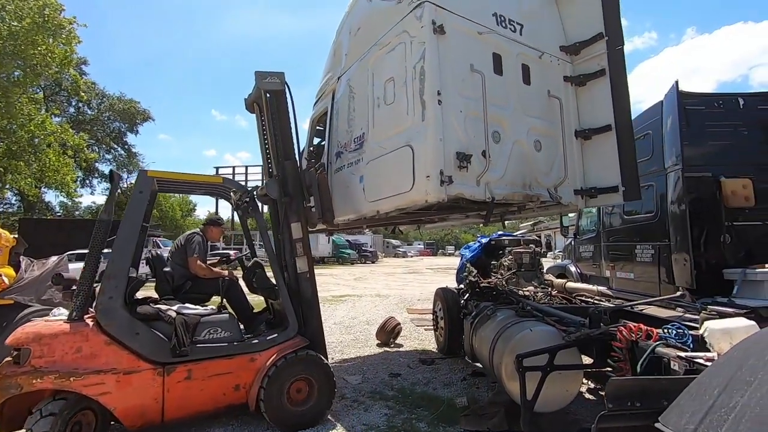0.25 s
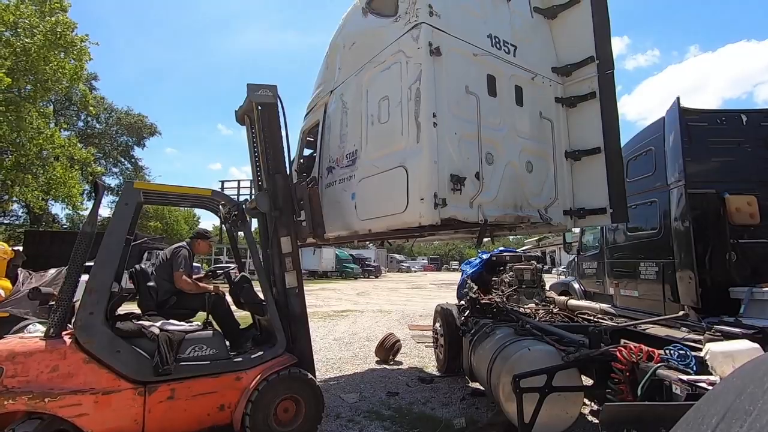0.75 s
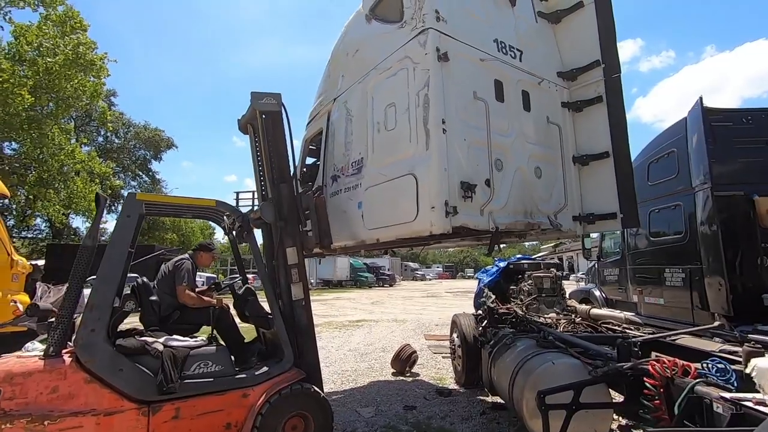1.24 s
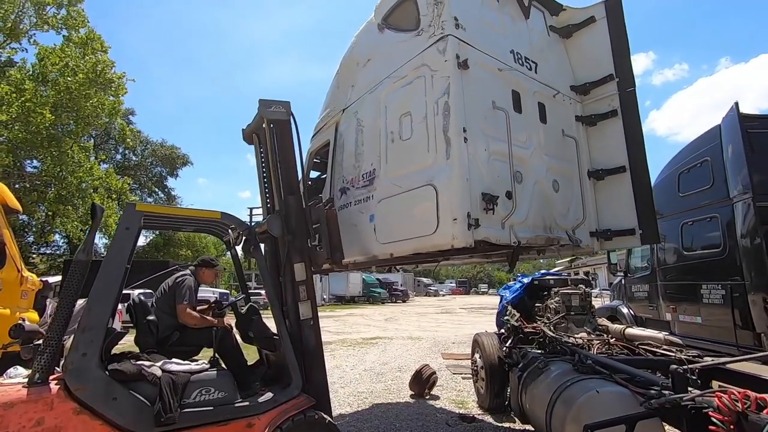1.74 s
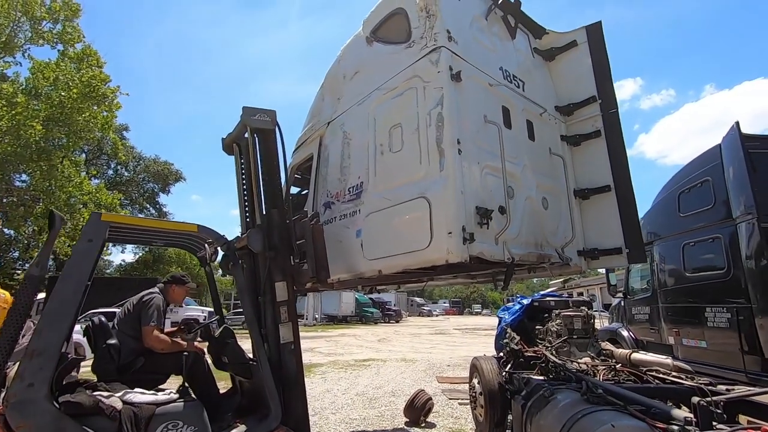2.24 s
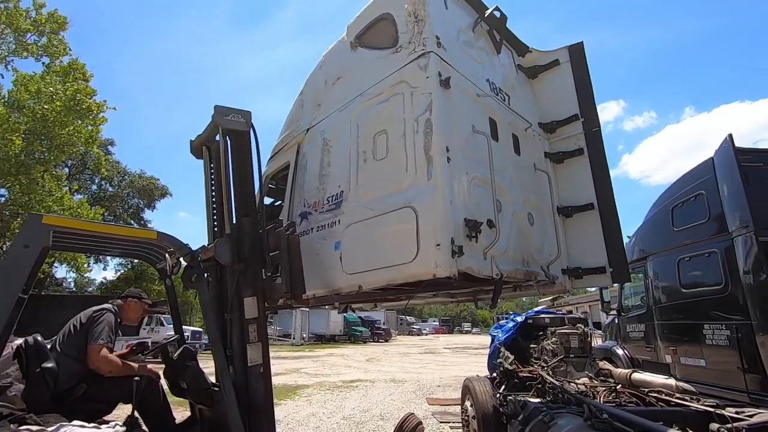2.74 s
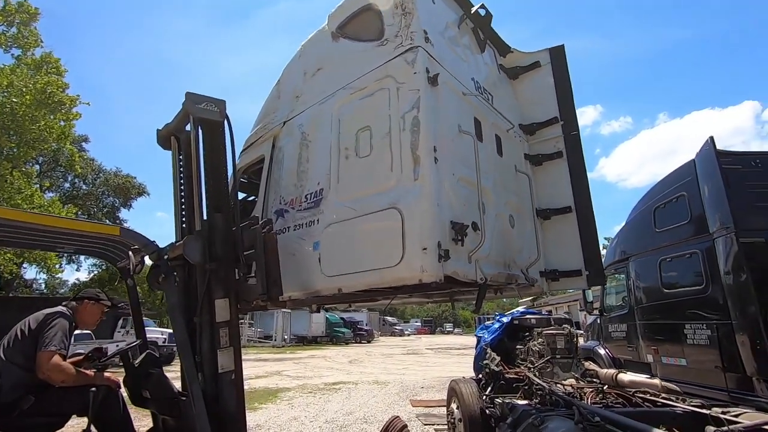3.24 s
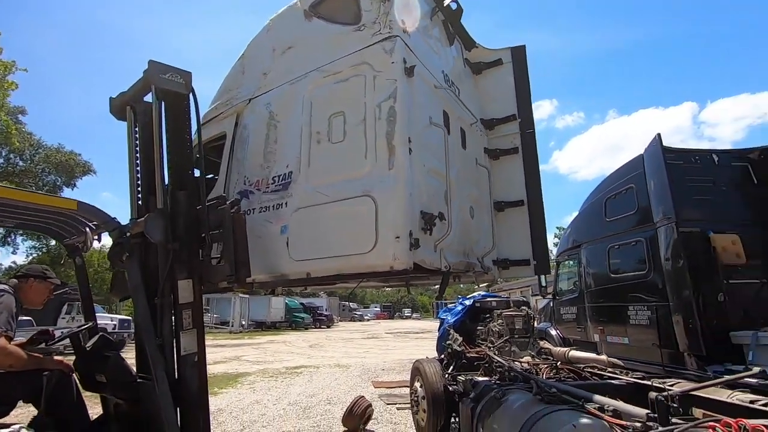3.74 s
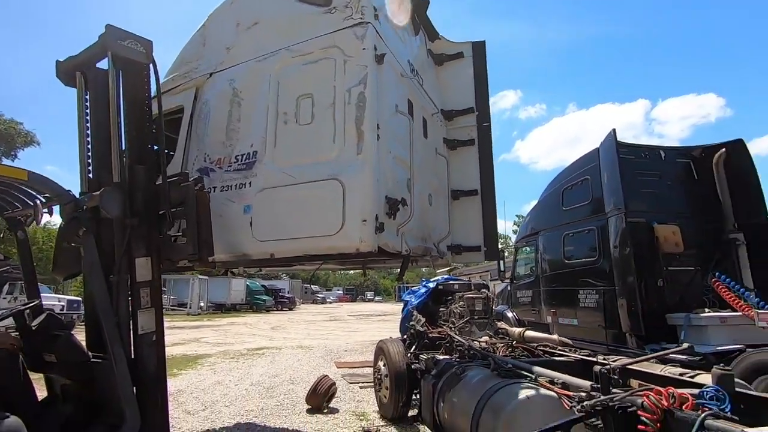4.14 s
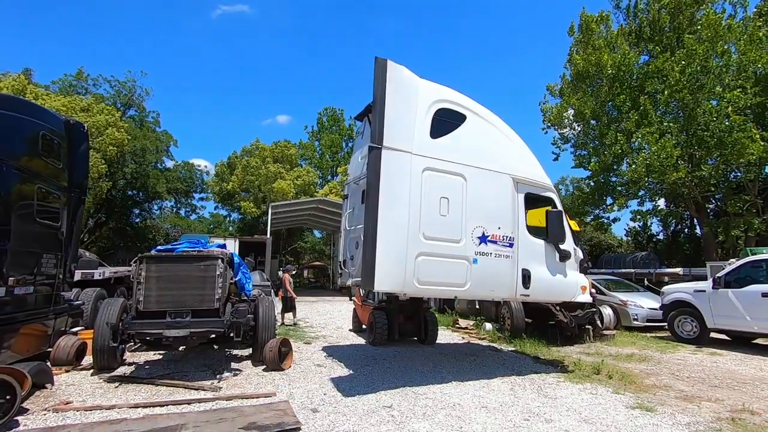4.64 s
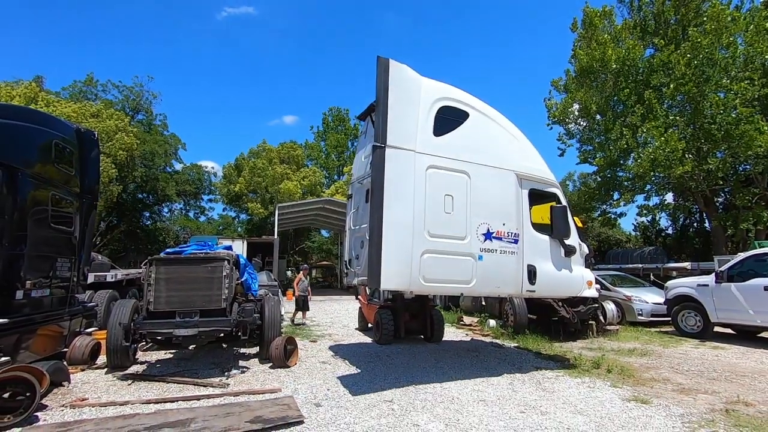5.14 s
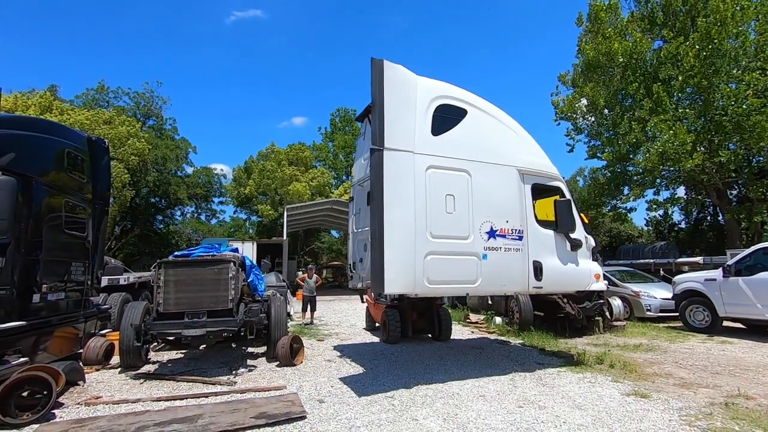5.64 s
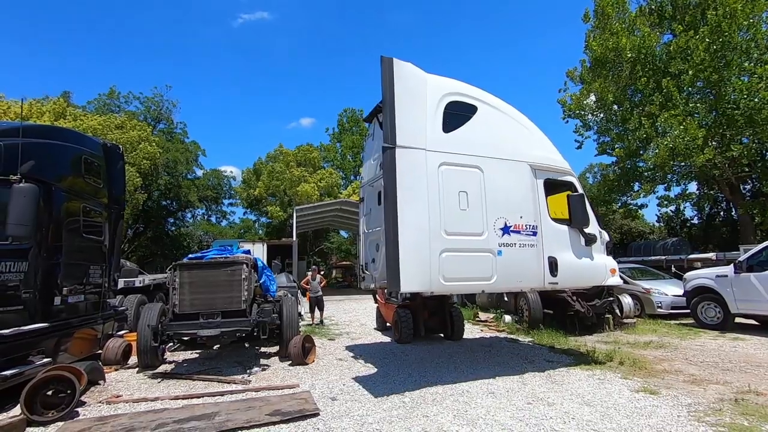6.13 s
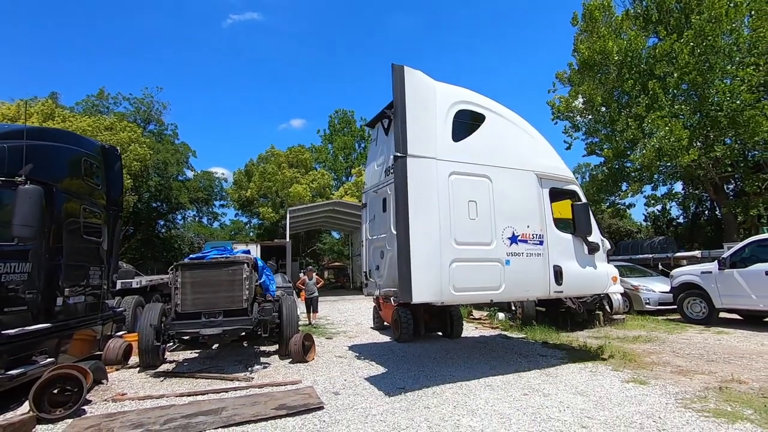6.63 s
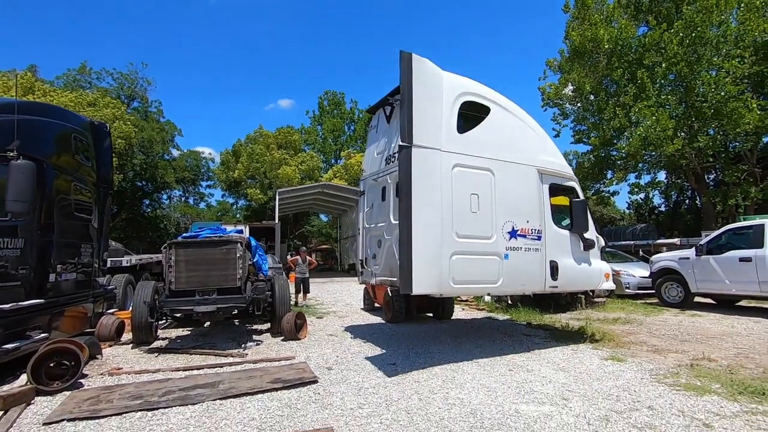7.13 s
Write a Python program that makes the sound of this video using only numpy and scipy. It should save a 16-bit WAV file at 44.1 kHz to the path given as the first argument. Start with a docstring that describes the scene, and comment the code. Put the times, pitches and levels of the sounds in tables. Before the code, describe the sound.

Steady low diesel engine hum with fan roar and gravel crunches up close, a short gap, then a duller distant engine and second throbbing drone.

```python
"""Exhaust hum, injector clatter, fan roar and crunching gravel: a three-cylinder diesel forklift idles along a yard.
It is heard from close by in stereo, then, after a short silence, from further off in mono, where a second
engine drones and a cicada pulses in the trees. The hum and whines are multiples of the engine cycle, the
clatter is struck resonances, the roar and hiss are shaped noise, and the gravel is showers of ringing grains."""
import sys
import numpy as np
from scipy import signal
from scipy.fft import rfft, irfft, next_fast_len
from scipy.io import wavfile
from scipy.ndimage import uniform_filter1d, map_coordinates

SR = 44100
rng = np.random.default_rng(int(sys.argv[2]) if len(sys.argv) > 2 else 0)


def to_wav(sig):
    """Store sig (one row per channel, or 1-D mono) as 16-bit WAV at the path in sys.argv[1].

    Samples outside -1..1 are clipped; the rate is SR.
    """
    pcm = np.clip(np.atleast_2d(sig), -1, 1) * 32767
    pcm = np.round(pcm).astype(np.int16)
    wavfile.write(sys.argv[1], SR, pcm.T)  # frames by channels


N = 325458
T = np.arange(N) / SR
OPEN_S = 4.668  # the distant view begins
FIRING_LEAD = .635  # share of a firing
# strength of each cylinder's injector tick, relative: level_db
CYLINDERS = [4.5, -.5, -1.5]


def amp(db):
    """Level law: a gain is 10 to the power of decibels over 20."""
    return 10 ** (np.asarray(db) / 20)


def unit(x):
    """Normalisation by power: the signal is scaled to rms 1."""
    return x / np.sqrt(np.mean(x ** 2) + 1e-20)


def along(points, hz):
    """Spectra are interpolated over log frequency from (Hz, value) points."""
    point_hz, value = np.transpose(points)
    return np.interp(np.log(hz + 1), np.log(point_hz + 1), value)


def curves(rows):
    """Linear interpolation in time: one value per sample for each column after the time."""
    s, *columns = np.transpose(rows)
    return [np.interp(T, s, column) for column in columns]


def between(ends, share):
    """Linear blend from the first row to the second as share goes from 0 to 1."""
    first, last = np.array(ends)[..., None]
    return first + (last - first) * share


def wobble(rate, size=1):
    """Slow random modulation: a spline through rate knots a second, read at every size-th sample."""
    return map_coordinates(rng.standard_normal(200), [T[::size] * rate])


def filtered(x, response):
    """Linear filtering: the spectrum is multiplied by a response of frequency."""
    m = next_fast_len(N + SR // 4)
    return irfft(rfft(x, m) * response(np.fft.rfftfreq(m, 1 / SR)), m)[..., :N]


def rush(spectrum, patchy_db):
    """Turbulence as coloured noise of rms 1, patchy in time and frequency."""
    z = signal.stft(rng.standard_normal(N), nperseg=512)[2]
    patches = uniform_filter1d(rng.standard_normal(z.shape), size=12, axis=1)
    patches = uniform_filter1d(patches, size=6, axis=0)
    noise = signal.istft(z * amp(patchy_db * unit(patches)), nperseg=512)[1][:N]
    return unit(filtered(noise, lambda hz: amp(along(spectrum, hz))))


def resonant(modes):
    """Modal response: a sum of (Hz, width Hz, dB) resonances of alternating sign, dull above 5 kHz."""
    def response(hz):
        total = 0
        for k, (centre, width, db) in enumerate(modes):
            damping = 1j * hz * width
            total = total + (-1) ** k * amp(db) * damping / (centre ** 2 - hz ** 2 + damping)
        return total / (1 + (hz / 5000) ** 4)
    return response


def contacts(events, response, rise_s):
    """Impact excitation: short decaying bursts of noise drive a response."""
    out, t = np.zeros(N), T[:SR // 5]
    for s, db, t60_s in events:
        envelope = amp(db - 60 * t / t60_s) * (1 - np.exp(-t / rise_s))
        out[round(s * SR):][:len(t)] += envelope * rng.standard_normal(len(t))
    return filtered(out, response)


def cicada():
    """Amplitude modulation: a high band of noise swells about eight times a second."""
    # time_s, mean_level_db
    loudness = [(4.7, -80), (5.5, -66), (7.38, -68)]
    # relative spectrum: frequency_hz, density_db
    band = [(7400, -40), (8200, 0), (9000, -3), (10000, -12), (11000, -40), (12000, -120)]
    swell = amp(6 * np.cos(2 * np.pi * (7.8 * T - .34)))
    return amp(curves(loudness)[0]) * swell * rush(band, patchy_db=2.0)


def gust():
    """Wind turbulence: one puff of low-frequency noise under a bell-shaped envelope."""
    # centre_s, half_width_s, peak_level_db
    s, width_s, peak_db = (6.0, .1, -31)
    low = [(15, -18), (35, -1.0), (55, -12), (100, -40), (300, -120)]
    return amp(peak_db) * np.exp(-((T - s) / width_s) ** 2) * rush(low, patchy_db=-4.5)


def drone():
    """Periodic firing: a second engine's first three harmonics slow a little and throb."""
    # time_s, fundamental_hz, level_db
    pitch_and_level = [(4.7, 68.4, -30), (5.7, 67.5, -28), (6.1, 67, -32), (6.4, 65, -35), (6.8, 64.5, -28),
                       (7.38, 64.3, -29)]
    # each harmonic relative to that level: level_db
    multiples_db = [-7, 1.5, -9]
    hz, level_db = curves(pitch_and_level)
    phase = 2 * np.pi * np.cumsum(hz + .6 * wobble(6)) / SR
    out = 0
    for k, db in enumerate(multiples_db, start=1):
        out = out + amp(level_db + db + 2 * wobble(9)) * np.sin(k * phase)
    return np.sqrt(2) * out


def yard():
    """Diffuse scattering: noise that is added to the left and subtracted from the right."""
    # relative spectrum: frequency_hz, density_db
    scattered = [(18, -37.5), (30, 10), (64, -17), (103, 2), (211, -29.5), (346, -16), (421, -16.5),
                 (1100, -11), (3350, -19), (4500, -26), (6680, -19), (9680, -35.5), (11000, -47.5),
                 (14200, -78.5), (22000, -120)]
    return amp(-34.5) * rush(scattered, patchy_db=2.1)


def gravel():
    """Granular friction: stones under the tyres ring as dense showers of short damped grains."""
    # tyre crunches before panning: peak_s, half_width_s, level_db, pitch_hz
    crunches = [(.08, 0.043, -41.5, 2600), (.16, 0.064, -35, 3050), (.24, 0.04, -39.5, 2450),
                (0.362, .06, -40, 3040), (0.45, 0.059, -37.5, 3070), (.3, .2, -44, 3520),
                (.46, 0.091, -48, 4980), (1.582, .25, -37.5, 3255), (1.302, 0.055, -38, 3000),
                (1.43, .05, -37, 2940), (1.521, 0.052, -37, 3225), (1.64, 0.046, -35.5, 2673),
                (1.799, 0.077, -41, 2700)]
    count, t, out = 550, T[:SR // 100], np.zeros(N)
    for s, width_s, db, hz in crunches:
        place, size, life = rng.random((count, 3)).T
        when = s + width_s * (4 * place - 2)
        pitch = hz * np.exp(.13 * rng.standard_normal(count))
        # few strong grains among many weak ones; none before time zero
        strength = amp(-2.1 * np.log(size)) * (when > 0)
        decay_s = .001 + .002 * life
        grains = strength[:, None] * np.sin(2 * np.pi * np.outer(pitch, t))
        grains = grains * np.exp(-t / decay_s[:, None]) * (1 - np.exp(-t / .0006))
        samples = (np.abs(when) * SR).astype(int)[:, None] + np.arange(len(t))
        rustle = np.bincount(samples.ravel(), grains.ravel(), N)
        # rms 1 over the four half widths that hold the grains
        rustle = rustle / np.sqrt(np.sum(rustle ** 2) / (4 * width_s * SR))
        out = out + amp(db) * np.exp(-np.abs((T - s) / width_s) ** 1.36) * rustle
    return out


def ticks():
    """Impact of light metal: soft bright contacts in the mast and chains."""
    # start_s, strength_db before the response, t60_s
    events = [(2.314, -31, .03), (2.4296, -45.5, 0.039), (2.596, -41, 0.21), (2.615, -40, 0.088),
              (3.32, -41, 0.22), (3.35, -39.5, .15)]
    bright = [(5000, -20), (9000, 0), (11000, -12), (15000, -28)]
    return contacts(events, lambda hz: amp(along(bright, hz)), rise_s=.003)


def bumps():
    """Modal ringing: faint dull knocks, perhaps the load on the forks."""
    # start_s, strength_db before the resonances, t60_s
    events = [(6.022, -9, .04), (6.048, -11, .04), (6.066, -11, .04), (6.502, -14, .05), (6.571, -9, .05),
              (6.69, -14, .05)]
    # what the bumps ring: frequency_hz, width_hz, level_db
    load = [(480, 220, -2), (706, 310, 3.5), (1460, 280, -12)]
    return contacts(events, resonant(load), rise_s=0.0013)


def fan():
    """Steady rotation: a low, slightly unsteady sine, perhaps the cooling fan."""
    # frequency_hz, level_db
    mean_hz, level_db = (47.3, -36)
    phase = 2 * np.pi * np.cumsum(mean_hz + 0.28 * wobble(0.77)) / SR
    return np.sqrt(2) * amp(level_db + 0.6 * wobble(3.5)) * np.sin(phase)


def whirr():
    """Band-limited noise: a narrow whirr near 3.4 kHz, perhaps from a belt."""
    return rush([(2700, -70.0), (3200, -15.5), (3380, 0.5), (3600, -13), (4200, -63.5)], patchy_db=3.5)


def sing(turns, tones):
    """Order tracking: thin tones of gears and pump keep fixed multiples of the engine cycle, wavering a little."""
    out = 0
    for k, db in tones:
        out = out + amp(db + 1.5 * wobble(4)) * np.cos(2 * np.pi * k * turns + .5 * wobble(5))
    return np.sqrt(2) * out


def pump(turns, upper):
    """Order tracking: pump whine at the 36th multiple of the cycle, with another tone at the 40th."""
    # 36th multiple: time_s, level_db
    whine = [(0, -48), (1.6, -42), (1.95, -42), (2.3, -44), (3.0, -37.5), (3.6, -36.5), (4.5, -35.5),
             (4.7, -39.5), (7.38, -46.5)]
    main = amp(curves(whine)[0]) * np.cos(2 * np.pi * 36 * turns + 1 + .1 * wobble(3))
    return np.sqrt(2) * (main + upper * np.cos(2 * np.pi * 40 * turns + .3 * wobble(3)))


def body():
    """Cavity and panel resonance: the body and hollow load boom mostly between 140 and 300 Hz."""
    # one swell of the boom: centre_s, half_width_s, rise_db
    s, width_s, swell_db = (2.45, 0.32, 4.3)
    hollow = [(60, -65.0), (140, -4), (190, -8.5), (245, -4.5), (290, -6.5), (380, -34), (900, -120)]
    return amp(swell_db * np.exp(-((T - s) / width_s) ** 2)) * rush(hollow, patchy_db=1.5)


def clatter(firing, modes, t60_s, rise_s, blow, cylinders, scatter_db):
    """Impulsive excitation: each firing rings metal parts with one blow and a short rattle; rms 1."""
    firing = firing + .0015 * wobble(25)  # timing scatter, share of a firing
    count = np.floor(firing).astype(int)
    since_s = (firing - count) / np.gradient(firing) / SR
    size_db = np.array(cylinders)[count % 3] + scatter_db * rng.standard_normal(400)[count]
    rattle = amp(-60 * since_s / t60_s) * (1 - np.exp(-since_s / rise_s)) * rng.standard_normal(N)
    impulses = blow * np.diff(count, prepend=count[0])
    return unit(filtered(amp(size_db) * (rattle + impulses), resonant(modes)))


def exhaust(turns, orders, groups_db, pipe, unsteady):
    """Fourier series of the engine cycle; unequal cylinders fill and unsettle the multiples between firings."""
    step = 8  # the series is summed at a lower rate
    slow, out = turns[::step], 0
    delay_firings, skew, first, upper = pipe
    for k, db in orders:
        loose = unsteady if k % 3 else .25
        waver_db = 1.7 * loose * wobble(5, size=step)
        waver = .25 * loose * wobble(3, size=step)
        # one cylinder stands out
        lag = 2 * np.pi * delay_firings * k / 3 + skew * (k % 3 > 0) * (k >= first)
        # the pipe delays the lowest multiples and disperses the highest
        lag += -1.3 * (k < 8) + .55 * (k < 5) + upper * (k > 11) - .06 * max(k - 15, 0) ** 2
        group_db = groups_db[0 if k == 9 else 1 + (k > 19) + (k > 32)][::step]
        out = out + amp(db + waver_db + group_db) * np.cos(2 * np.pi * k * slow + lag + waver)
    return np.sqrt(2) * signal.resample_poly(out, step, 1)[:N]


def forklift(turns, levels_db, orders, roar, hiss, pipe, unsteady, throb_db, patchy_db):
    """Superposition on one crankshaft: hum, whine, throbbing roar, knocks, ticks, hiss and booming body."""
    # engine casing: frequency_hz, width_hz, level_db
    block = [(733, 63, -4), (1427, 150, 2), (1688, 80, 0.5), (3330, 220, -20)]
    # casing knock of each cylinder, relative: level_db
    knocks = [1, -4, 1]
    # injector and valve cover: frequency_hz, width_hz, level_db
    injector = [(2140, 230, 0.5), (2398, 130, 3), (3400, 200, -18)]
    upper, mid, knock, tick, air, boom = amp(levels_db[4:])
    firing = 3 * turns + FIRING_LEAD
    throb = amp(throb_db * np.cos(2 * np.pi * (firing - .15)))
    out = exhaust(turns, orders, levels_db[:4], pipe, unsteady) + pump(turns, upper)
    out = out + mid * throb * rush(roar, patchy_db)
    # the casing knock follows the injector tick by .05 of a firing
    out = out + knock * clatter(firing - .05, block, t60_s=0.11, rise_s=0.0009, blow=9,
                                cylinders=knocks, scatter_db=1.5)
    out = out + tick * clatter(firing, injector, t60_s=.04, rise_s=.001, blow=20,
                               cylinders=CYLINDERS, scatter_db=1.3)
    return out + air * rush(hiss, patchy_db=1.05) + boom * body()


def far_view():
    """Distant source: one shared channel of forklift, bumps, drone, cicada and wind."""
    # time_s, engine_cycles_per_s
    speed = [(4.75, 10.812), (5.28, 10.839), (5.8, 10.837), (6.33, 10.848), (6.85, 10.842), (7.38, 10.828)]
    # exhaust before group levels: multiple_of_cycle, level_db
    orders = [(2, -33), (3, -13), (4, -23), (5, -27), (6, -16), (7, -23), (8, -17), (9, 0), (10, -10),
              (11, -13), (12, -15), (13, -17), (14, -28), (15, -17), (16, -20), (17, -32), (18, -25),
              (19, -21.5), (20, -27), (21, -25), (22, -29), (23, -31), (24, -28), (25, -29), (26, -29),
              (28, -34), (29, -31), (31, -30), (32, -34), (33, -33), (34, -31)]
    # relative spectra: frequency_hz, density_db
    roar = [(20, -13.5), (45, -1.5), (70, 0.5), (110, -3.5), (150, -2), (200, -5.5), (260, -7.5),
            (310, -11), (370, -12.5), (425, -16.5), (500, -16), (640, -13.5), (780, -10.5), (950, -17.5),
            (1300, -19), (2000, -25.5), (3500, -34.5), (5000, -76.5)]
    hiss = [(1760, -21), (3000, -25.5), (3510, -4.5), (3910, -1), (5300, -3), (6910, -2), (8720, -16),
            (10100, -23), (11000, -31.5), (14200, -64), (22000, -120)]
    # delay_firings, shift_between_firings_rad, first_multiple_shifted, shift_above_11th_rad
    pipe = (-.9955, .7, 10, .4)
    # first and last row, in dB: 9th multiple, others to 19, 20-32, from 33, 40th-multiple whine,
    # roar, knock, tick, hiss, body boom
    levels = [(-16.5, -18, -21, -15, -64, -27, -51, -66.5, -51.5, -40.5),
              (-20, -19.5, -22.5, -17, -62.5, -27.5, -49, -60.5, -50, -37.5)]
    # thin tones: multiple_of_cycle, level_db
    tones = [(54, -51), (144, -57), (216, -62)]
    turns = np.cumsum(curves(speed)[0]) / SR + .0785
    travel = np.clip((T - OPEN_S) / (7.38 - OPEN_S), 0, 1)
    far = forklift(turns, between(levels, travel), orders, roar, hiss, pipe,
                   unsteady=.55, throb_db=.6, patchy_db=1.1)
    return far + sing(turns, tones) + bumps() + drone() + cicada() + gust()


def near_view():
    """Near source in stereo: a central forklift, opposed yard scatter, and gravel stronger on the left."""
    # time_s, engine_cycles_per_s
    speed = [(0.0, 10.885), (0.5, 10.875), (1.0, 10.867), (1.49, 10.896), (1.99, 10.894), (2.49, 10.919),
             (2.99, 10.91), (3.48, 10.884), (3.98, 10.907), (4.48, 10.874)]
    # exhaust before group levels: multiple_of_cycle, level_db
    orders = [(1, -40), (2, -44), (3, -9), (4, -28), (5, -40), (6, -10), (7, -12), (8, -18), (9, 0),
              (10, -19), (11, -24), (12, -9), (13, -26), (14, -37), (15, -16), (16, -21), (17, -29),
              (18, -27), (19, -30), (20, -39), (21, -33), (22, -21.5), (23, -34), (24, -31), (25, -36),
              (26, -25), (27, -42), (28, -33), (29, -34), (30, -27), (31, -28), (32, -22), (33, -20.5),
              (34, -27), (35, -31), (37, -28), (41, -29), (43, -29), (46, -31)]
    # relative spectra: frequency_hz, density_db
    roar = [(20, -15.5), (45, -3.5), (80, -0.5), (125, -5.5), (160, -9), (220, -9.5), (300, -15),
            (360, -10.5), (435, -14), (500, -13), (620, -16.5), (745, -13.5), (830, -15.5), (900, -15.5),
            (1000, -17), (1110, -16.5), (1250, -17.5), (1900, -20.5), (2500, -22.5), (4000, -32.5),
            (5000, -78.5)]
    hiss = [(1650, -41), (2800, -4.5), (3320, 2.5), (4680, -5.5), (6740, -5.5), (8570, -15.5), (9710, -18),
            (11000, -33.5), (14200, -54.5), (22000, -120)]
    # delay_firings, shift_between_firings_rad, first_multiple_shifted, shift_above_11th_rad
    pipe = (0, 1.4, 8, -.47)
    # rows before and after the swing, in dB, columns as in the distant view
    levels = [(-17, -19.3, -22.5, -18, -45, -28.5, -53.5, -53.5, -41.5, -42.5),
              (-18.4, -16.8, -18, -24.5, -51, -29, -39, -42.5, -43, -37)]
    # how far the truck has swung its engine side to the listener: time_s, share
    swings = [(0, 0.04), (1.5, 0.08), (2.4, 0.74), (3.1, 0.87), (4.5, 1)]
    # lower resonances of the ticks before the swing: frequency_hz, width_hz, level_db
    early_injector = [(1890, 150, 2), (2600, 300, -12)]
    # levels before and after the swing: before_db, after_db
    early_db = (-47, -61.5)
    whirr_db = (-69, -56)
    # thin tones at half swing: multiple_of_cycle, level_db
    tones = [(68, -52), (82, -54), (102, -55), (132, -50)]
    # stereo balance: frequency_hz, left_minus_right_db
    lean = [(60, -0.5), (110, -0.5), (190, 0.0), (340, 0.0), (600, 1.0), (1060, 1.0), (1880, 1.5),
            (3330, 0.5), (5920, -1.5), (10500, -1.5)]
    turns = np.cumsum(curves(speed)[0]) / SR + .0581
    swing, = curves(swings)
    mid = forklift(turns, between(levels, swing), orders, roar, hiss, pipe,
                   unsteady=.6, throb_db=1.0, patchy_db=.5)
    early = clatter(3 * turns + FIRING_LEAD, early_injector, t60_s=.04, rise_s=.001, blow=18,
                    cylinders=CYLINDERS, scatter_db=2)
    mid = mid + amp(between(early_db, swing)) * early
    mid = mid + amp(8.5 * (swing - 0.5)) * sing(turns, tones)  # grows 8.5 dB over a full swing
    mid = mid + ticks() + fan() + amp(between(whirr_db, swing)) * whirr()
    side = yard()
    near = filtered(np.array([mid + side, mid - side]),
                    lambda hz: amp(np.outer([.5, -.5], along(lean, hz))))
    return near + gravel() * amp([[3.5], [-4.5]])


def scene():
    """Envelope control: the close view drops away steeply, then the distant one fades in."""
    cut_s, cut_db_per_s = 4.512, 2002
    open_length_s, open_bend = 0.085, 2.15
    fade_out = amp(-cut_db_per_s * np.maximum(T - cut_s, 0))
    fade_in = np.clip((T - OPEN_S) / open_length_s, 0, 1) ** open_bend
    return near_view() * fade_out + far_view() * fade_in


def record(dry):
    """Soft saturation rounds the peaks; a band limit then removes everything from 15.1 kHz up."""
    soft = dry / (1 + np.abs(dry / 0.75) ** 3) ** (1 / 3)
    return filtered(soft, lambda hz: hz < 15100)


dry = scene()
out = record(dry)
to_wav(out)
```